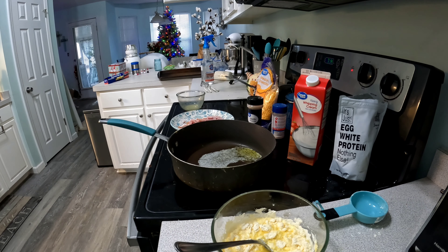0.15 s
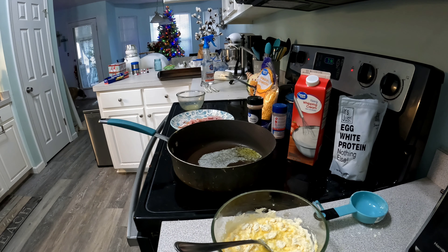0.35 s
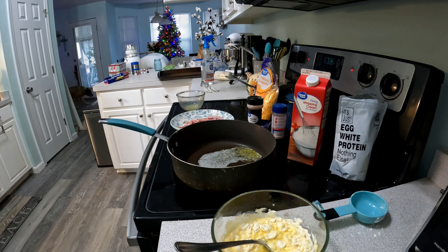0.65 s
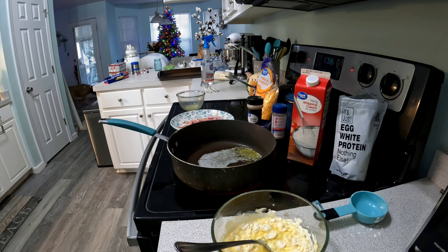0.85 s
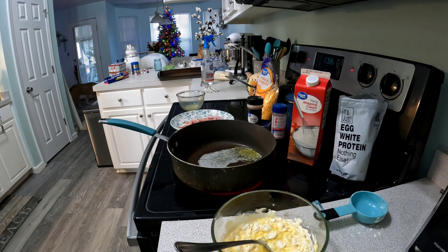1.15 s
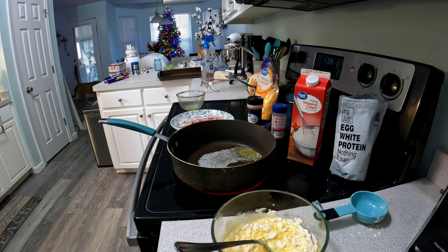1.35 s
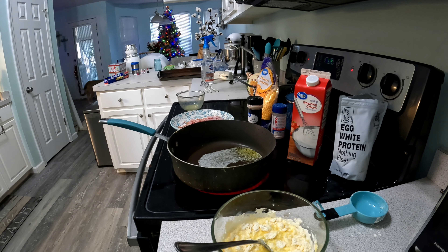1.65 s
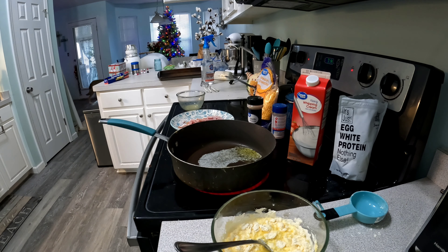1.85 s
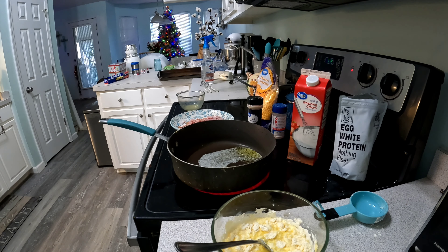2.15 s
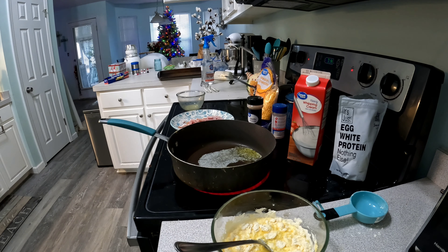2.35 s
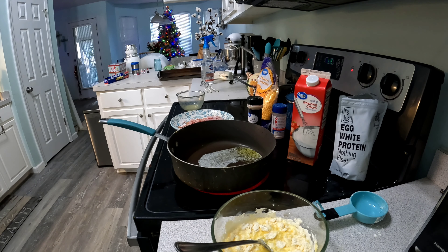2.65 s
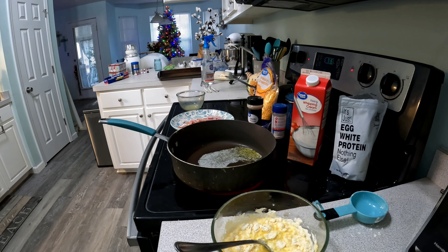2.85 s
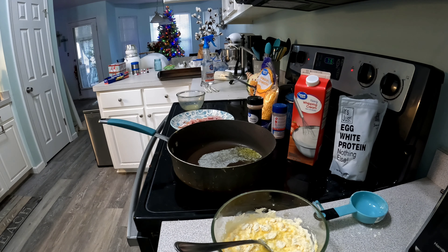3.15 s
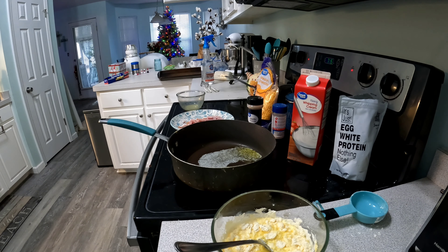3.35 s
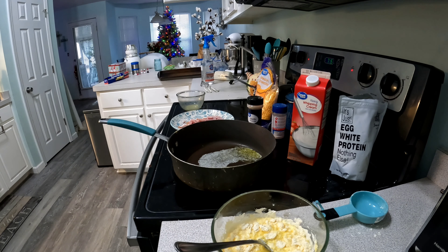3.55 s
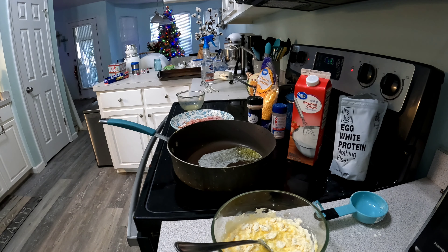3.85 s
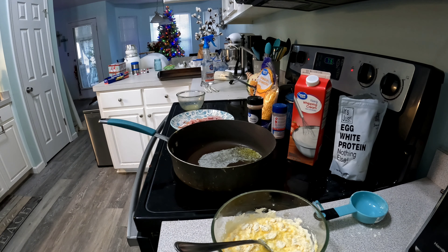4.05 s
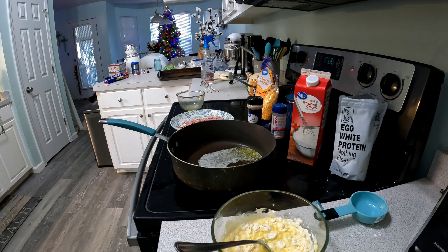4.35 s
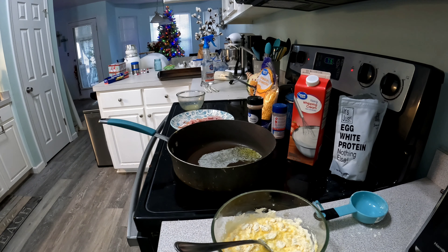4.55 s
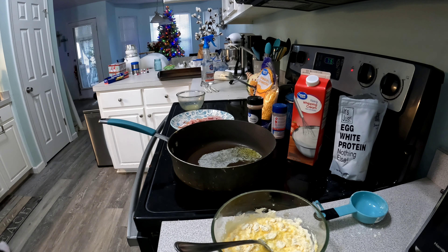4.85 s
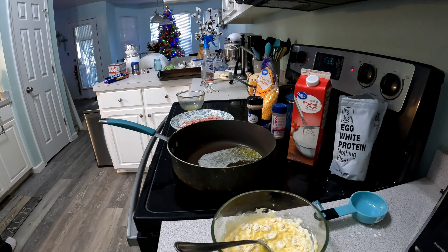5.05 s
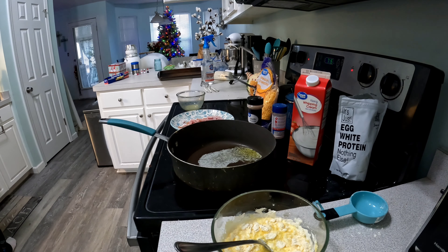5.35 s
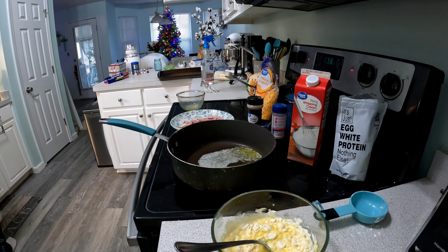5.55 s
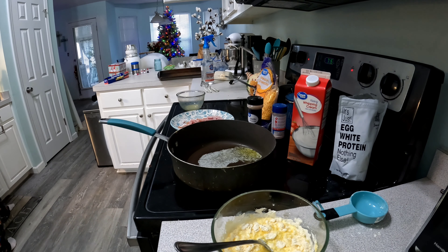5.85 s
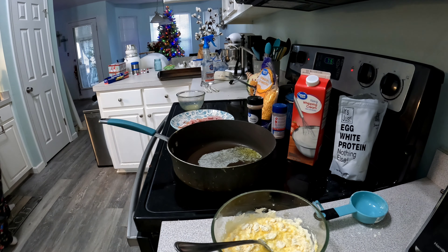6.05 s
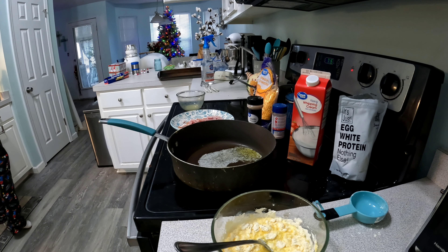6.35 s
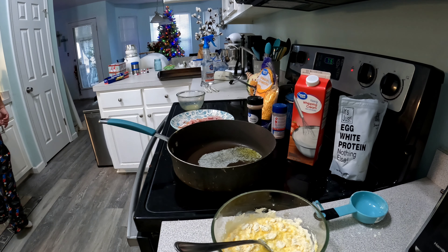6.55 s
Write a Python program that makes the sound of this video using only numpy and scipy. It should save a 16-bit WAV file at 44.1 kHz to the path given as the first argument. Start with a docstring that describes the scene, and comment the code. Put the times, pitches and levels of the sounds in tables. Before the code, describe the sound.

Near, dry sizzling pops over a low appliance hum, with drawers rolling, thudding and rattling loose utensils a few metres away.

```python
"""Kitchen drawers and a frying pan

Someone searches kitchen drawers a few metres away: loose utensils clatter and metal ones clang in the room.
Filtered clicks make the clatter; fading tones make clangs and booms; low noise makes the drawers roll.
Close by, fat spits in a warming pan, made of short noise bursts, over a low hum of wavering tones."""
import sys
import numpy as np
from scipy import signal
from scipy.fft import rfft, irfft
from scipy.io import wavfile

SR = 44100
rng = np.random.default_rng(int(sys.argv[2]) if len(sys.argv) > 2 else 0)


def to_wav(s):
    """Save 16-bit WAV."""
    ch = np.atleast_2d(s).T  # columns
    pcm = np.round(np.clip(ch, -1, 1) * 32767)  # PCM
    wavfile.write(sys.argv[1], SR, pcm.astype(np.int16))


N = 295955
TIME = np.arange(N) / SR  # seconds

# How strong each pitch is in a bright snap of fat. Each row: frequency in Hz, relative level in dB.
SNAP = [(3800, -8.5), (4600, -14), (5300, -4.5), (6000, -0.5), (7600, -10), (8600, -17), (10500, -27),
        (15500, -44.5)]
# How strong each pitch is in the low room noise. Each row: frequency in Hz, relative level in dB.
AIR = [(20, 1.5), (48, -6.5), (140, -3), (200, -10), (340, -12.5), (450, -24.5), (650, -23.5), (850, -34.5),
       (2000, -26), (4500, -57)]


def undb(db):
    """Turn decibels into gain."""
    return 10 ** (np.asarray(db) / 20)


def over_hz(table, hz, axis=1):
    """Read one column of a table at any frequency, joining its rows on a log-frequency axis."""
    rows = np.array(table, float)
    return np.interp(np.log(hz + 1e-3), np.log(rows[:, 0]), rows[:, axis])


def unit(x, seconds):
    """Scale x to the energy of a sound of rms 1 that lasts so many seconds."""
    return x * np.sqrt(seconds * SR / np.sum(x ** 2))


def add(track, s, x):
    """Mix x into the track from time s on."""
    i = max(int(s * SR), 0)
    track[i:i + len(x)] += x[:max(N - i, 0)]


def through(x, response):
    """Pass x through an impulse response."""
    return signal.fftconvolve(x, response)[:N]


def body(colour, stretch=1, size=2048):
    """Unit-energy response of a thing with this spectrum, falling steeply outside the table."""
    hz = np.fft.rfftfreq(size, 1 / SR) / stretch + 1
    octaves_outside = np.abs(np.log2(hz / np.clip(hz, colour[0][0], colour[-1][0])))
    level_db = over_hz(colour, hz) - np.minimum(45 * octaves_outside, 75)
    # Folding the cepstrum puts the energy at the start, so nothing sounds before the blow.
    cepstrum = irfft(np.log(undb(level_db)))
    cepstrum[1:size // 2] *= 2
    cepstrum[size // 2 + 1:] = 0
    return unit(irfft(np.exp(rfft(cepstrum))), 1 / SR)


def noise(colour):
    """Noise of rms 1 with this spectrum."""
    white = rng.standard_normal(N)
    return unit(through(white, body(colour, size=16384)), N / SR)


def walk(rate):
    """A random wander of spread about 1, drawn from so many random points a second."""
    knots = np.arange(0, N / SR + 1, 1 / rate)
    return np.interp(TIME, knots, rng.standard_normal(len(knots)))


def envelope(events, attack_s, release_s):
    """Gain over time for rows of start, length and dB: each rises, holds and dies away."""
    gain = np.zeros(N)
    for s, length, db in events:
        rise = np.clip((TIME - s) / attack_s, 0, 1)
        fall = np.exp(-np.maximum(TIME - s - length, 0) / release_s)
        gain = np.maximum(gain, undb(db) * rise * fall)
    return gain


def ring(strikes, modes, ring_s, scatter_db=1.0, detune=0.011, jostle_rate=60):
    """A struck thing rings in its modes, high ones more briefly; jostling neighbours keep pulling the pitch."""
    out, t = np.zeros(N), TIME[:SR // 2]
    knots = np.arange(64) / jostle_rate
    for s, level_db, *pitch in strikes:
        tone = 0
        for hz, db in modes:
            pull = np.interp(t, knots, rng.standard_normal(len(knots)))
            pulled_hz = hz * np.prod(pitch) * (1 + detune * pull)
            phase = 2 * np.pi * np.cumsum(pulled_hz) / SR
            weight = undb(db + scatter_db * rng.standard_normal()) * rng.choice([-1, 1])
            t60 = ring_s * np.sqrt(modes[0][0] / hz)  # seconds to fall by 60 dB
            tone = tone + weight * np.sin(phase) * np.exp(-np.log(1000) * t / t60)
        add(out, s, unit(tone, 0.079) * undb(level_db))
    return out


def background(air_db=1.5, flutter_db=4.0):
    """Low room noise, and a soft mid-range hiss that wavers and sometimes swells."""
    # Brief swells above the steady hiss. Each row: start in seconds, length in seconds, added gain in dB.
    swells = [(-.05, 0.33, -69), (.42, 0.13, -62), (.87, 0.087, -56)]
    # How strong each pitch is in the hiss. Each row: frequency in Hz, relative level in dB.
    hiss_colour = [(900, -11), (1400, 2.5), (2100, 2.5), (2800, -8.5), (4500, -9.5)]
    steady_db, attack_s, release_s = -64, 0.094, 0.021
    hiss_gain = undb(steady_db) + envelope(swells, attack_s, release_s)
    hiss = noise(hiss_colour) * hiss_gain * undb(flutter_db * walk(30))
    return undb(-54.5 + air_db) * noise(AIR) + hiss


def hum(waver_db=2):
    """Mains hum and a motor tone of the appliances: steady pitches whose levels slowly waver."""
    # The humming tones. Each row: frequency in Hz, middle level in dB.
    tones = [(59.2, -59.5), (119.6, -57), (145.3, -64.5)]
    out = np.zeros(N)
    for hz, db in tones:
        tone = np.sqrt(2) * np.sin(2 * np.pi * (hz * TIME + rng.random()))
        out += undb(db + waver_db * walk(1.92)) * tone
    return out


def spit(colour, stretch=1, burst_s=0.00092, pan_s=0.044, pan_db=-20, pulse_db=11):
    """A water droplet bursts in hot fat: a pulse, a millisecond of spray, brief echoes between the pan's walls."""
    t = TIME[:SR // 50]
    spray = np.exp(-t / burst_s)
    echoes = undb(pan_db) * np.exp(-t / pan_s)
    burst = rng.standard_normal(len(t)) * (spray + echoes)
    burst[0] = undb(pulse_db)
    return unit(through(burst, body(colour, stretch)), 0.0097)


def sizzle(count=300, scatter_db=4.0, tick_db=-5.5, hiss_db=-7.5, patchy_db=5.5, crowding=.8):
    """Tiny bubbles burst, each at its own pitch, over a fine uneven hiss; both grow as the pan warms."""
    # How strong each pitch is in the fine hiss. Each row: frequency in Hz, relative level in dB.
    sizzle_colour = [(1000, -1), (2000, -2), (3200, -4), (5000, 1.5), (6500, -1.5), (7600, -1.5),
                     (8600, -19), (10500, -12.5), (12500, -16), (15500, -46)]
    hot_db, cool_db, warming_s = -57.5, -11.5, 0.61  # final gain, shortfall at the start, time constant
    ticks = np.zeros(N)
    for when, pitch, size in rng.random((count, 3)):
        db = tick_db + scatter_db * min(-np.log(size), 2.8)
        start_s = when ** crowding * N / SR  # below 1, crowding makes the ticks denser towards the end
        add(ticks, start_s, spit(SNAP, 2 ** (.5 * (pitch - .5))) * undb(db))
    heat = undb(hot_db + cool_db * np.exp(-TIME / warming_s))
    hiss = undb(hiss_db + patchy_db * walk(14.0)) * noise(sizzle_colour)
    return (ticks + hiss) * heat


def contacts(spread_s, count, swell_s=0., scatter_db=7.5, lead_db=-14):
    """A jolt: light touches build up to the main blow, then loose things click together in a fading run."""
    when = rng.random(count) * (swell_s + spread_s) - swell_s
    size = rng.standard_normal(count)
    sign = rng.choice([-1, 1], count)
    when[0], size[0] = 0, 0  # the main blow
    build_up = undb(lead_db * np.abs(np.minimum(when, 0)) / max(swell_s, 1 / SR))
    shape = np.where(when < 0, build_up, np.exp(-when / spread_s))
    run = np.zeros(SR // 5)
    place = np.clip((when + swell_s) * SR, 0, len(run) - 1).astype(int)
    run[place] = sign * undb(scatter_db * size) * shape
    return run


def drawer_contents(wood_db=0.0, clatter_db=1.5, rattle_db=-4, variety=0.083, count=3):
    """Each jolt is a few runs of clicks, heard together through the wooden box, bulky utensils and
    small bright ones, each slightly shifted in pitch."""
    # Jolts of a drawer. Each row: start in seconds, build-up to the main blow in seconds,
    # relative box level in dB, relative utensil level in dB, extra level of the small bright ones in dB.
    knocks = [(0, 0.00096, -54.5, -59, 4), (1.338, 0.026, -58, -52.5, 6), (1.441, 0.0061, -61, -51, 0),
              (1.505, 0.0075, -44.5, -48, -10), (1.76, .012, -40, -45, -2.5),
              (1.995, 0.021, -42, -44, -2.5), (2.122, .025, -38.5, -44, 1.5),
              (2.205, 0.011, -41.5, -57, 2.5), (2.255, .02, -44, -50, -1), (2.463, 0.0081, -44, -52, 5.5),
              (3.106, 0.021, -51.5, -51.5, -3.5), (3.288, 0.021, -49, -55.5, -8),
              (3.375, 0.0095, -42, -40.5, -1.5), (3.562, 0.0068, -44, -45, 7.5),
              (3.625, .012, -39.5, -40.5, 8.5), (3.682, .004, -44.5, -39, 5), (3.785, .017, -34.5, -38, -2),
              (3.924, .012, -40, -38.5, -0.5), (3.99, 0.017, -45, -43.5, -6), (4.368, .008, -40, -45, -5),
              (4.41, .027, -42.5, -43.5, -6), (4.571, 0.0076, -47.5, -69, -8),
              (4.756, 0.0047, -49.5, -51.5, -28), (5.16, 0.031, -39, -45.5, -10)]
    # How strong each pitch is in the wooden box. Each row: frequency in Hz, relative level in dB.
    wood = [(160, 3), (260, -1.5), (325, 2), (400, -3), (520, -8), (760, -20)]
    # The same for bulky utensils. Each row: frequency in Hz, relative level in dB.
    clatter = [(400, -14.5), (600, -0.5), (787, -8.5), (938, 4.5), (1090, -3), (1500, 3), (1750, -2),
               (2150, 2), (2750, -12), (3580, -18.5)]
    # The same for small bright utensils. Each row: frequency in Hz, relative level in dB.
    rattle = [(2200, -3), (2800, -11), (3500, 6), (4600, 4), (6000, -0.5), (7500, -3.5), (8600, -17.5),
              (12000, -26)]
    out = np.zeros(N)
    for s, swell_s, box_db, utensil_db, bright_db in knocks:
        runs = [contacts(spread_s=.036, count=7, swell_s=swell_s) for _ in range(count)]
        layers = ((wood, box_db + wood_db),
                  (clatter, utensil_db + clatter_db),
                  (rattle, utensil_db + bright_db + rattle_db))
        for colour, level_db in layers:
            jolt = 0
            for run in runs:
                stretch = 1 + variety * rng.uniform(-1.08, 1)
                jolt = jolt + signal.fftconvolve(run, body(colour, stretch))
            add(out, s, unit(jolt, 0.06) * undb(level_db))
    return out


def spits(snap_db=0, crack_db=-2):
    """The loudest spits of fat: a bright snap over a lower crack."""
    # Single spits. Each row: start in seconds, relative snap level in dB, relative crack level in dB,
    # snap pitch in Hz (6000 leaves the snap's spectrum as it is).
    pops = [(0.1648, -35, -42.5, 6200), (0.228, -43.5, -53.5, 5560), (0.2901, -47.5, -60.5, 6450),
            (0.4948, -52, -54, 6200), (0.908, -49, -64, 5840), (0.956, -41, -48.5, 5900),
            (1.109, -38, -48, 5520), (1.1504, -45.5, -61, 6250), (1.47, -51, -46, 6350),
            (1.6618, -33.5, -29.5, 6160), (1.7286, -40, -38, 4900), (1.971, -39.5, -45, 5700),
            (2.516, -43.5, -42, 6550), (2.5954, -44.5, -51, 5800), (2.725, -49, -54, 5770),
            (2.842, -51, -60, 6000), (3.39, -43.5, -40, 5800), (3.529, -46.5, -47, 6500),
            (4.1043, -39, -36, 6200), (4.16, -45.5, -46, 5940), (4.2825, -49.5, -42, 5600),
            (4.374, -44.5, -55, 5870), (4.541, -63, -37.5, 5500), (4.7178, -37, -37.5, 5540),
            (4.8686, -40, -52, 5780), (4.912, -42, -48.5, 5100), (5.189, -43.5, -40.5, 5430),
            (5.2686, -64, -42.5, 5600), (5.3537, -48, -62, 5700), (5.4968, -41, -51.5, 6020),
            (5.6872, -48, -49.5, 6400), (5.7677, -47.5, -40, 6300), (5.8128, -39.5, -43.5, 6170),
            (5.9303, -53, -68, 6100), (6.0237, -43.5, -37, 6700), (6.131, -46, -56, 6800),
            (6.4923, -39, -43.5, 4900), (6.527, -45, -56, 5400), (6.646, -43.5, -46, 5400),
            (6.6706, -42, -39.5, 5450)]
    # How strong each pitch is in the lower crack. Each row: frequency in Hz, relative level in dB.
    crack = [(250, 1), (600, -2), (1200, 1), (1700, -3), (2300, 4.5), (3400, 0.5), (4300, -2), (5500, -14)]
    out = np.zeros(N)
    for s, high_db, low_db, hz in pops:
        snap_part = spit(SNAP, hz / 6000) * undb(high_db + snap_db)
        crack_part = spit(crack) * undb(low_db + crack_db)
        add(out, s, snap_part + crack_part)
    return out


def runner_rumble(roll_db=-3):
    """A drawer slides along its runners: low noise that rises, holds and dies away with each pull."""
    # Pulls of a drawer. Each row: start in seconds, length in seconds, relative rumble level in dB.
    pulls = [(1.36, 0.98, -36), (2.08, 0.46, -33.5), (3.06, 0.84, -37), (3.62, 0.34, -28.5),
             (4.12, 0.44, -35), (4.75, 0.062, -34.5), (5.02, 0.1, -37.5)]
    # How strong each pitch is in the rumble. Each row: frequency in Hz, relative level in dB.
    roll_colour = [(20, -6.5), (35, -4.5), (62, -2.5), (75, 2.5), (108, 1), (155, -14), (260, -17.5),
                   (320, -12.5), (450, -24), (1800, -36.5)]
    return undb(roll_db) * noise(roll_colour) * envelope(pulls, attack_s=0.042, release_s=0.2)


def cabinet_booms(rise_s=0.0021, decay_s=0.052):
    """The cabinet booms at its own listed times: low tones that swell quickly and soon fade."""
    # Booms of the cabinet. Each row: start in seconds, level in dB, pitch in Hz.
    booms = [(1.364, -36.5, 88), (1.512, -27, 83.8), (1.772, -28.5, 78.5), (2.149, -24.5, 89),
             (2.486, -23.5, 85.6), (2.765, -37.5, 100), (3.124, -34, 81.7), (3.686, -27.5, 79.6),
             (3.802, -25, 93), (3.936, -22, 77.8), (4.374, -31, 77.5), (4.438, -32, 76.3),
             (4.765, -35, 72.5), (5.169, -33, 97.2)]
    out, t = np.zeros(N), TIME[:SR // 2]
    for s, db, hz in booms:
        shape = (1 - np.exp(-t / rise_s)) ** 2 * np.exp(-t / decay_s)
        boom = np.sin(2 * np.pi * hz * t) * shape
        add(out, s, unit(boom, 0.027) * undb(db))
    return out


def runner_drone(centre_hz=141, judder_hz=5, judder_db=2):
    """A runner judders into a drone during one steady pull: a tone whose pitch and level wander."""
    # The droning pull. Each row: start in seconds, length in seconds, middle level in dB.
    drones = [(3.05, 0.443, -43.5)]
    phase = 2 * np.pi * np.cumsum(centre_hz + judder_hz * walk(6.4)) / SR
    drone = np.sqrt(2) * np.sin(phase) * undb(judder_db * walk(23.1))
    return drone * envelope(drones, attack_s=0.027, release_s=0.047)


def cabinet():
    """The low sounds of the furniture: rolling runners, booms and a drone."""
    return runner_rumble() + cabinet_booms() + runner_drone()


def drawer_stops():
    """A drawer runs into its stop and its panels ring briefly."""
    # Blows on the stop. Each row: start in seconds, level in dB, pitch ratio.
    stops = [(1.778, -46.5, 0.88), (4.385, -41.5, 0.98), (4.46, -41.5, 0.93), (5.196, -40.5, 0.98)]
    # Modes of the panels. Each row: frequency in Hz before the pitch ratio, relative level in dB.
    panels = [(350, 1.5), (662, -11), (1130, -4.5), (1660, -9), (2330, -7.5)]
    return ring(stops, panels, ring_s=0.09)


def metal_clangs():
    """Metal utensils strike each other and ring in many modes."""
    # Strikes of metal. Each row: start in seconds, level in dB, pitch ratio.
    clangs = [(3.634, -39.5, 1.1), (3.687, -28.5, 1), (3.701, -34, .98), (3.714, -40, 1.04),
              (3.735, -39.5, 1), (3.834, -37, 1.04), (3.932, -41.5, 1.08)]
    # Modes of the utensils. Each row: frequency in Hz before the pitch ratio, relative level in dB.
    metal = [(910, -8.5), (1000, -13), (1384, -18), (1530, -9), (1650, -5.5), (2186, 2.5), (2277, -3),
             (2417, -7.5), (2810, -12.5), (3203, -5.5), (3340, -1.5), (3490, -8), (3914, -9.5), (4750, -15)]
    return ring(clangs, metal, ring_s=0.081)


def free_chimes():
    """One utensil swings free and sings on, with a steadier pitch."""
    # Strikes of the free utensil. Each row: start in seconds, level in dB.
    chimes = [(3.965, -49), (4.025, -43.5), (4.09, -47)]
    # Its modes. Each row: frequency in Hz, relative level in dB.
    free_metal = [(1535, 0), (1816, -3), (2116, -11), (2283, -11)]
    return ring(chimes, free_metal, ring_s=.24, scatter_db=0.5, detune=.0035)


def hollow_clacks():
    """A sharp, hollow clack close by: a few modes that die very fast."""
    # Clacks. Each row: start in seconds, level in dB.
    clacks = [(4.104, -43)]
    # Modes of the clack. Each row: frequency in Hz, relative level in dB.
    hollow = [(851, -1), (1130, 0.5), (1500, -0.5)]
    return ring(clacks, hollow, ring_s=0.028)


def room(x, build_s=0.0017):
    """Diffuse kitchen echoes: noise that builds up quickly and fades at its own speed in each band."""
    # How long echoes last. Each row: frequency in Hz, time to fall by 60 dB in seconds.
    fade_times = [(100, 0.38), (300, 0.38), (1000, 0.53), (3000, 0.58), (7000, 0.28), (14000, 0.33)]
    t = TIME[:SR // 2]
    hz = np.fft.rfftfreq(len(t), 1 / SR)
    octave = np.log2(hz + 1)
    spectrum, tail = rfft(rng.standard_normal(len(t))), 0
    for centre in np.arange(6, 14.5, .5):  # bands half an octave apart
        share = np.maximum(1 - 2 * np.abs(octave - centre), 0)
        fade = np.exp(-np.log(1000) * t / over_hz(fade_times, 2 ** centre))
        band = irfft(spectrum * share, len(t)) * fade * (1 - np.exp(-t / build_s))
        tail = tail + unit(band, share.mean() / SR)
    return through(x, unit(tail, 1 / SR))


def kitchen(x, shift_hz=0.4506):
    """As someone moves between the drawers, the sound turns slowly between two patterns of echoes."""
    turn = 2 * np.pi * shift_hz * TIME
    return room(x * np.cos(turn)) + room(x * np.sin(turn))


def ports(shared, unshared):
    """Two microphone ports hear the same sound with a small tilt and lag, and part of it differently."""
    # How the ports differ. Each row: frequency in Hz, left minus right in dB, left phase lead in radians,
    # gain of the unshared sound in dB.
    port_table = [(90, 0, 0, -32), (300, .8, 0, -20), (600, 2.5, -.25, -13), (1300, 2.5, -.6, -9),
                  (2400, .8, -.95, -8), (4400, 1.8, -.5, -6), (6500, 1, -.05, -10), (13000, 0, 0, -8)]
    hz = np.fft.rfftfreq(N, 1 / SR)
    balance, lead, apart = (over_hz(port_table, hz, axis=k) for k in (1, 2, 3))
    mid, side = rfft(shared), rfft(unshared) * undb(apart)
    channels = []
    for way in (1, -1):  # left, right
        spectrum = (mid + way * side) * undb(way * balance / 2) * np.exp(.5j * way * lead)
        channels.append(irfft(spectrum, N))
    return np.array(channels)


def scene(wood_direct_db=-6, metal_direct_db=-4, metal_room_db=-2.5, near_room_db=-5,
          pan_room_db=-11, pan_side_db=-5, air_side_db=2, port_noise_db=-65):
    """The drawers are far and full of echo, the pan is near and dry; each port adds a faint noise of its own."""
    contents = drawer_contents()
    ringing = metal_clangs() + drawer_stops()
    near = free_chimes() + hollow_clacks()
    pan = spits() + sizzle()
    direct = pan + near + cabinet()
    direct = direct + undb(wood_direct_db) * contents + undb(metal_direct_db) * ringing
    far = contents + undb(metal_room_db) * ringing + undb(near_room_db) * near
    shared = direct + kitchen(far + undb(pan_room_db) * pan) + hum() + background()
    unshared = kitchen(far + undb(pan_side_db) * pan + cabinet()) + undb(air_side_db) * background()
    port_noise = np.array([noise(AIR), noise(AIR)])
    return ports(shared, unshared) + undb(port_noise_db) * port_noise


def record(dry):
    """The microphones roll off in the high treble, then a steep filter cuts the top."""
    roll_off_hz, top_hz = 13000, 15300
    soft = signal.sosfilt(signal.butter(4, roll_off_hz, fs=SR, output="sos"), dry)
    return signal.sosfilt(signal.ellip(8, .2, 70, top_hz, fs=SR, output="sos"), soft)


dry = scene()
out = record(dry)
to_wav(out)
```